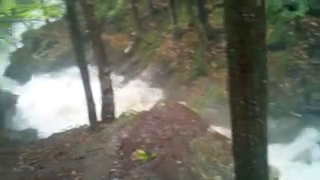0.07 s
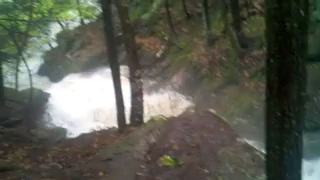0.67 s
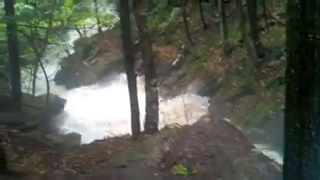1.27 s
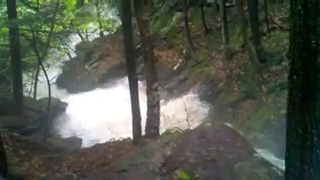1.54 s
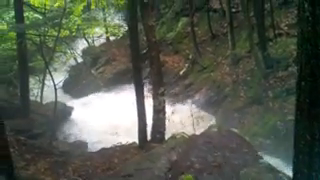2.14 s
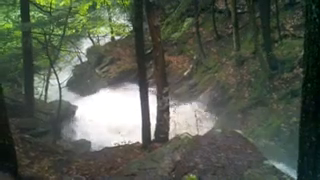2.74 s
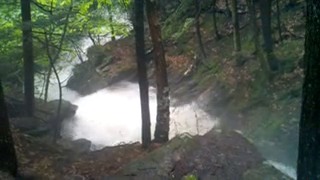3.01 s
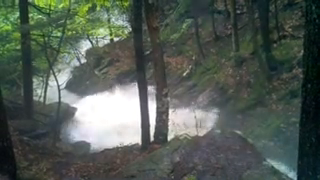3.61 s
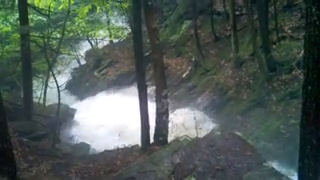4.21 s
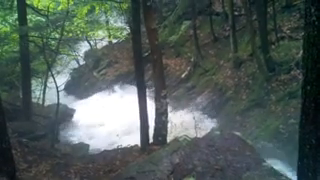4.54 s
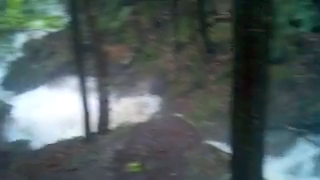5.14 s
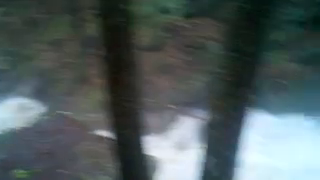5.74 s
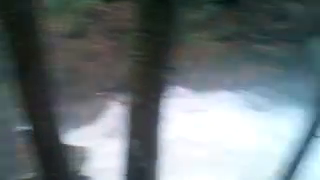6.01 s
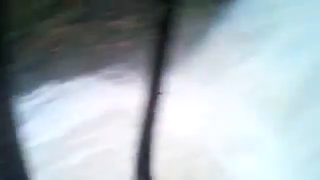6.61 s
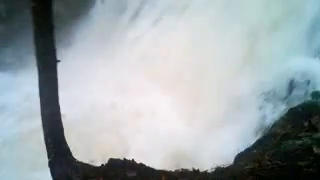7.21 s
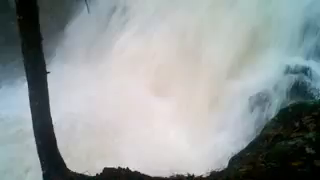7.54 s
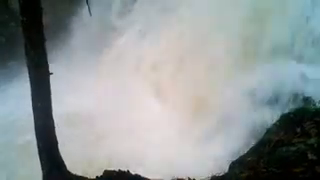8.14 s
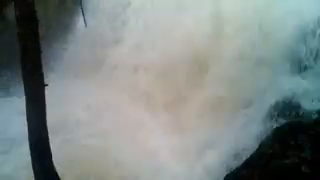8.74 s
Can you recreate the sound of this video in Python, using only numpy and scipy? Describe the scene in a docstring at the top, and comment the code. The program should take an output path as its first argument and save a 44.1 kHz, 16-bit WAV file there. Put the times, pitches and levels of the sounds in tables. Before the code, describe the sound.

Dense, steady roar of a swollen waterfall crashing on rocks, with bubbling churn, a hiss of spray and faint late wind puffs.

```python
"""A waterfall in flood pours into a wooded gorge, heard from the bank by a close microphone pair.
From the start, turbulence and bubbles roar on the right, sheets of water crash on rocks, and a diffuse
wash and hissing spray fill the air. Low and mid bands swell briefly in the roar, with a splash near 5.1 s.
Near 5.8 s the listener turns to the pool and the ground echo lags more; near 6.7 s a second turn centres
the fall, now brighter. From about 7.4 s the fall's draught puffs at the microphones."""
import sys
import numpy as np
from scipy import signal
from scipy.fft import rfft, irfft
from scipy.io import wavfile

SR = 44100
rng = np.random.default_rng(int(sys.argv[2]) if len(sys.argv) > 2 else 0)


def log_audio(samples):
    """Write samples as a 16-bit WAV file to the path given in sys.argv[1]."""
    # one column per channel
    frames = np.atleast_2d(samples).T
    # limit to full scale, then quantise
    limited = np.clip(frames, -1, 1)
    pcm = np.round(limited * 32767).astype(np.int16)
    wavfile.write(sys.argv[1], SR, pcm)


N = 391166
TIME, FREQS = np.arange(N) / SR, np.maximum(np.arange(N // 2 + 1) * SR / N, 1)

# strength of the flow, of which only the swing about the mean is heard: t/s, level/dB
FLOW_LEVEL = [(0.1, -31), (0.5, -31), (1.15, -32.5), (2.2, -31.5), (3.5, -30.5), (4.6, -31), (5.3, -30),
              (6.2, -31), (7.0, -30), (7.9, -30.5), (8.7, -31)]
# spectra of the roar from the side, across the pool and from the front: f/Hz, density/(dB per Hz)
SIDE_SPECTRUM = [(50, -83.5), (70, -76), (100, -63.5), (160, -54.5), (230, -49), (300, -49.5), (420, -51.5),
                 (560, -53), (740, -53.5), (950, -61), (1300, -64), (2000, -90)]
POOL_SPECTRUM = [(60, -89.5), (100, -64), (190, -54.3), (280, -48.5), (400, -54.5), (520, -56),
                 (750, -55.5), (1000, -61.5), (1300, -66.5), (2000, -83)]
FRONT_SPECTRUM = [(60, -88), (110, -62.5), (190, -53), (270, -53.5), (440, -57.5), (600, -54.5),
                  (820, -59.5), (980, -60.5), (1300, -63), (1800, -75.5), (2500, -52.5), (4500, -82.5)]
# sheets of water breaking on rock: f/Hz, density/(dB per Hz)
CRASH_SPECTRUM = [(500, -83.5), (800, -66), (1030, -61), (1400, -64), (1900, -67), (2800, -78.5)]
# diffuse field of the rapids and gorge walls: f/Hz, density/(dB per Hz)
WASH_SPECTRUM = [(50, -85), (70, -82.5), (100, -67), (180, -60), (420, -58.5), (750, -62), (1200, -62.5),
                 (1650, -63.5), (2100, -63.5), (2700, -62.5), (3500, -91)]
# spray and bursting foam: f/Hz, density/(dB per Hz)
SPRAY_SPECTRUM = [(700, -85), (1400, -67), (2100, -61), (2700, -58.5), (3500, -64), (4200, -65),
                  (5200, -70.5), (6100, -65.5), (7200, -64.5), (8200, -63.5), (8900, -76.5), (9300, -99.5)]
# change in the hiss when facing the fall: f/Hz, gain/dB
SPRAY_FRONT_GAIN = [(1400, -2), (2400, 1.5), (3600, -2), (4800, 1), (6200, 0.6), (8000, 1.4)]
# brief swells of band noise in the roar, with a splash near 5.1 s: t/s, centre f/Hz, half-width/s, level/dB
ROAR_SWELLS = [(0.254, 1200, .035, -31), (0.565, 437, 0.043, -26.5), (0.673, 904, .02, -33),
               (1.35, 427, .018, -24), (1.356, 980, 0.017, -31), (3.7, 1076, 0.032, -31),
               (3.816, 435, 0.032, -24), (4.072, 390, 0.018, -19.5), (4.22, 430, 0.025, -26),
               (4.612, 1421, .02, -30), (4.715, 400, 0.027, -24), (5.1, 1180, 0.017, -26.5),
               (5.133, 700, 0.014, -24), (5.283, 353, 0.031, -29), (5.6, 385, 0.019, -26),
               (7.26, 1250, .018, -28), (7.605, 1010, 0.022, -30), (7.91, 1250, .03, -29.5),
               (8.181, 1200, 0.012, -27), (8.538, 173, 0.025, -31)]
# the listener's turns, to the pool and then to the fall: middle t/s, duration/s, share of a whole turn
TURNS = [(5.77, .1, .48), (6.7, 0.49, 0.48)]
# puffs of draught at the microphones: t/s, half-width/s, level/dB
DRAUGHT_PUFFS = [(7.36, 0.013, -39), (7.882, .015, -28), (7.947, .028, -37), (8.06, .025, -38),
                 (8.30, .035, -37), (8.465, .03, -35)]
# comb filtering of the pair's sum and difference: f/Hz, depth (0-1)
COMB_DEPTH = [(600, 0.19), (1000, 0.64), (1250, 1), (4100, 1), (4600, 0.6), (5200, 0.71), (6400, 0.05),
              (7300, 0.3), (8000, 0.78)]
# extra gain of the pair's difference signal: f/Hz, gain/dB
DIFFERENCE_GAIN = [(1000, -0.04), (1500, 9.5), (2050, 2), (2650, -4.5), (3500, 2), (4400, 0.5),
                   (6200, -0.5), (7500, -2.4)]


def from_db(db):
    """Amplitude grows tenfold for every 20 dB."""
    return 10 ** (np.asarray(db) / 20)


def unit_power(x):
    """Division by the RMS value normalises the power to one."""
    return x / np.sqrt(np.mean(x ** 2) + 1e-20)


def at_hz(table, hz):
    """Linear interpolation on a logarithmic frequency axis."""
    known_hz, values = np.transpose(table)
    return np.interp(np.log(hz), np.log(known_hz), values)


def colour(white, spectrum):
    """Linear filtering gives flat noise of unit power a spectral density in dB per Hz."""
    return irfft(rfft(white) * from_db(at_hz(spectrum, FREQS)) * np.sqrt(SR / 2), N)


def drift(rate_hz):
    """Low-pass filtered noise wanders smoothly, with unit RMS."""
    hop, settling = 100, 1000
    pole = np.exp(-2 * np.pi * rate_hz * hop / SR)
    white = rng.standard_normal(N // hop + settling + 2)
    slow = signal.lfilter([1], [1, -2 * pole, pole * pole], white)[settling:]
    return np.interp(np.arange(N) / hop, np.arange(len(slow)), unit_power(slow))


def turbulence(depth_db, rate_hz, channels):
    """Random amplitude modulation: each octave of noise swells on its own as lumps of water break up."""
    white, out = rfft(rng.standard_normal((channels, N))), 0
    octave = np.clip(np.log2(FREQS / 50).astype(int), 0, 7)
    for k in np.unique(octave):
        out += irfft(white * (octave == k), N) * from_db(depth_db * drift(rate_hz))
    return unit_power(out)


def bubbles(per_s, low_hz, high_hz, cycles, spread_db, pitches):
    """Damped resonance: bubbles born at random ring at their own pitch, falling 60 dB in `cycles`."""
    strengths = from_db(spread_db * np.minimum(rng.exponential(1, N), 5)) * rng.choice([-1, 1], N)
    births = strengths * (rng.random(N) < per_s / SR)
    pitch_index, out = rng.integers(0, pitches, N), 0
    for k, hz in enumerate(np.geomspace(low_hz, high_hz, pitches)):
        radius, angle = np.exp(-np.log(1000) * hz / (cycles * SR)), 2 * np.pi * hz / SR
        resonator = [1, -2 * radius * np.cos(angle), radius * radius]
        ring = signal.lfilter([1, 0, -1], resonator, births * (pitch_index == k) + 1e-18)
        out += unit_power(ring) * np.sqrt(hz)   # equal power per Hz
    return unit_power(out)


def roar(to_pool, to_fall):
    """Turbulence and bubble resonance at the foot of the fall, coloured by the listening direction."""
    churn = bubbles(per_s=3000, low_hz=216.6, high_hz=1900, cycles=22, spread_db=3, pitches=24)
    water = turbulence(depth_db=0.63, rate_hz=9.2, channels=1)[0] + from_db(-19) * churn
    side = (1 - to_pool) * colour(water, SIDE_SPECTRUM)
    pool = (to_pool - to_fall) * colour(water, POOL_SPECTRUM)
    front = to_fall * colour(water, FRONT_SPECTRUM)
    direct = side + front + crashes(to_fall)
    return direct + pool + ground_echo(direct, to_pool)


def crashes(to_fall, aside_db=-5.5):
    """Impact noise: sheets of water break unevenly on the rocks, weaker until the listener faces them."""
    splashes = turbulence(depth_db=2.5, rate_hz=13, channels=1)[0]
    return from_db(aside_db * (1 - to_fall)) * colour(splashes, CRASH_SPECTRUM)


def ground_echo(direct, to_pool, lag_before_s=0.001944, lag_after_s=0.003126, reflection=0.29):
    """Leafy ground reflects the lows late; the hollow interference colour sinks as the path grows."""
    lag_s = lag_before_s + (lag_after_s - lag_before_s) * to_pool
    delayed = np.interp(TIME - lag_s, TIME, direct)
    absorption = signal.butter(1, 1120, fs=SR, output="sos")
    return reflection * signal.sosfilt(absorption, delayed)


def wash():
    """A diffuse field: rapids and gorge echo arrive from all sides, uncorrelated between channels."""
    return colour(turbulence(depth_db=1, rate_hz=1.6, channels=2), WASH_SPECTRUM)


def spray(facing):
    """Small bubbles resonate high: their fizz joins the hiss of mist, a little brighter from the front."""
    fizz = np.array([bubbles(per_s=9800, low_hz=1860, high_hz=9200, cycles=4.6, spread_db=6, pitches=12)
                     for channel in "LR"])
    mist = turbulence(depth_db=1, rate_hz=13, channels=2)
    side = colour(mist + from_db(-14) * fizz, SPRAY_SPECTRUM)
    front = irfft(rfft(side) * from_db(at_hz(SPRAY_FRONT_GAIN, FREQS)), N)
    return (1 - facing) * side + facing * front


def burst(noise, at_s, half_width_s, level_db):
    """A Gaussian envelope shapes noise into a swell with the given RMS level at its top."""
    bell = np.exp(-np.minimum(((TIME - at_s) / half_width_s) ** 2, 50))
    return from_db(level_db) * unit_power(noise * bell) * np.sqrt(np.mean(bell ** 2))


def swells(edge_ratio=1.265):
    """Amplitude modulation: low and mid bands of noise swell briefly in the roar, once as a splash."""
    white, out = rng.standard_normal(N), np.zeros(N)
    for at_s, hz, half_width_s, level_db in ROAR_SWELLS:
        band = signal.butter(2, [hz / edge_ratio, hz * edge_ratio], "band", fs=SR, output="sos")
        out += burst(signal.sosfilt(band, white), at_s, half_width_s, level_db)
    return out


def turn(middle_s, duration_s):
    """Half a cycle of harmonic motion carries a turn gently from 0 to 1."""
    return .5 + .5 * np.sin(np.pi * np.clip((TIME - middle_s) / duration_s, -.5, .5))


def bearing(facing, aside_db=-8.25, ahead_db=0.15):
    """A level difference, left minus right, moves the fall from right to centre at constant power."""
    difference_db = aside_db * (1 - facing) + ahead_db * facing
    gains = from_db(difference_db * np.array([[.5], [-.5]]))
    return gains / np.sqrt(np.mean(gains ** 2, axis=0))


def draught(low_hz=55, high_hz=135):
    """Eddy pressure: air pushed out by the fall thuds on the microphone ports, in antiphase."""
    band = signal.butter(2, [low_hz, high_hz], "band", fs=SR, output="sos")
    eddies = signal.sosfilt(band, rng.standard_normal(N))
    thuds = sum(burst(eddies, *puff) for puff in DRAUGHT_PUFFS)
    return thuds * np.array([[1], [-1]])


def scene():
    """Superposition of the sources; roar and spray follow the flow and the listener's turns."""
    flow_db = np.interp(TIME, *np.transpose(FLOW_LEVEL))
    surge_db = flow_db - flow_db.mean()
    roar_db = 0.4 * surge_db - 0.13   # the roar swings less than the spray
    to_pool, to_fall = [turn(at_s, duration_s) for at_s, duration_s, share in TURNS]
    facing = sum(share * turn(at_s, duration_s) for at_s, duration_s, share in TURNS)
    plunge = from_db(roar_db) * roar(to_pool, to_fall) + swells()
    return plunge * bearing(facing) + wash() + from_db(surge_db) * spray(facing) + draught()


def comb_gain(power, notch_edge=0.13):
    """Notch shaping: the root of the comb's power, with an extra cut that deepens and widens each notch."""
    return np.sqrt(power) * power ** 2 / (power ** 2 + notch_edge ** 2)


def record(dry, comb_spacing_hz=2607, low_cut_hz=66, high_cut_hz=9200):
    """Comb filtering: the pair's delayed cross-feed cancels sum and difference in turn, widening the image."""
    left, right = rfft(dry)
    comb = at_hz(COMB_DEPTH, FREQS) * np.cos(2 * np.pi * FREQS / comb_spacing_hz)
    mid = (left + right) / 2 * comb_gain(1 - comb)
    side = (left - right) / 2 * comb_gain(1 + comb) * from_db(at_hz(DIFFERENCE_GAIN, FREQS))
    widened = irfft([mid + side, mid - side], N)
    high_pass = signal.butter(6, low_cut_hz, "high", fs=SR, output="sos")
    low_pass = signal.ellip(14, .1, 80, high_cut_hz, fs=SR, output="sos")
    return signal.sosfilt(low_pass, signal.sosfilt(high_pass, widened))


dry = scene()
out = record(dry)
log_audio(out)
```